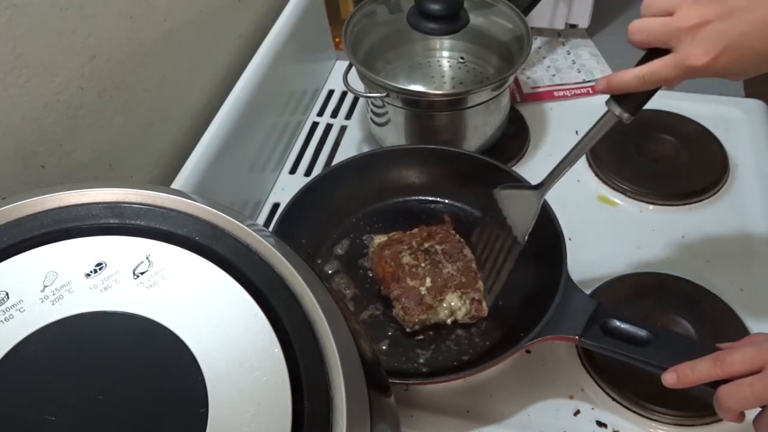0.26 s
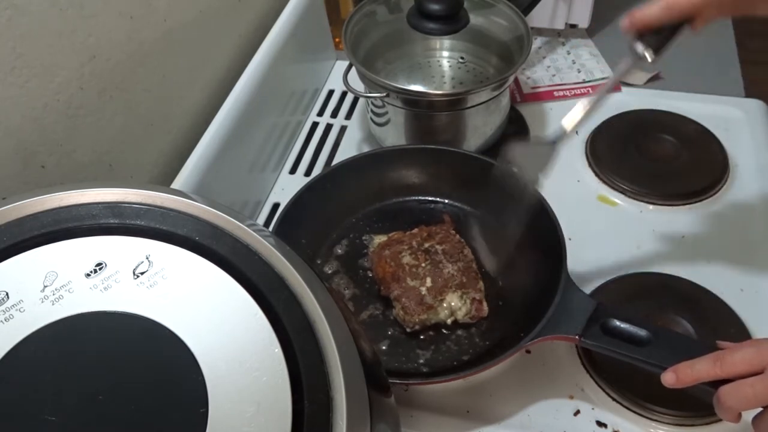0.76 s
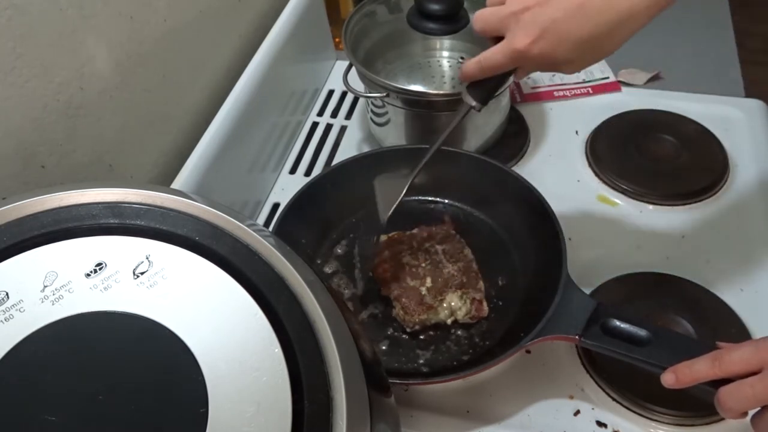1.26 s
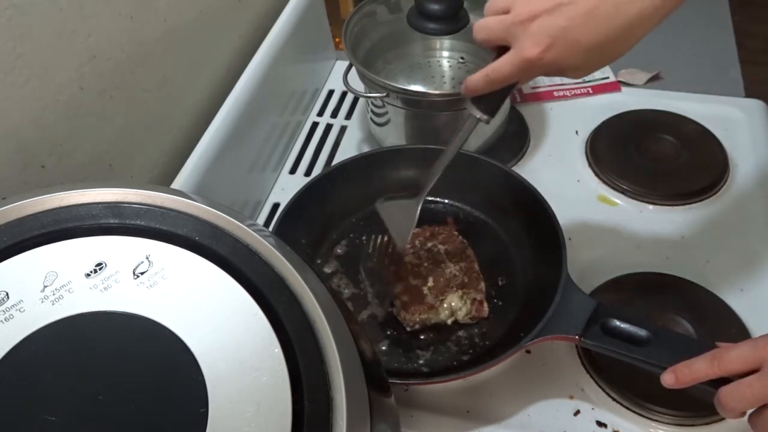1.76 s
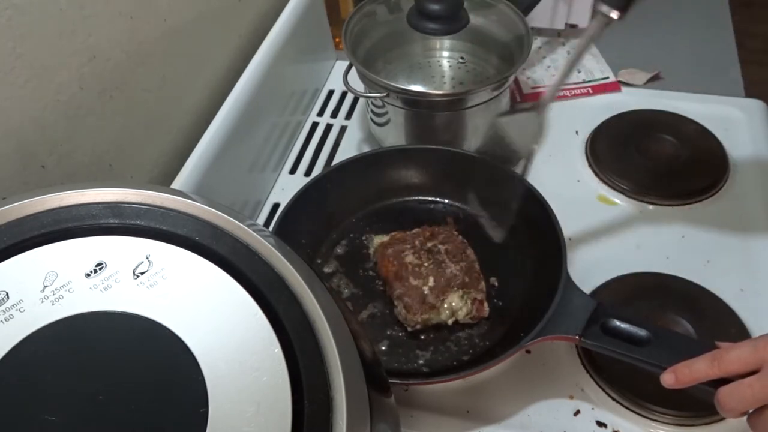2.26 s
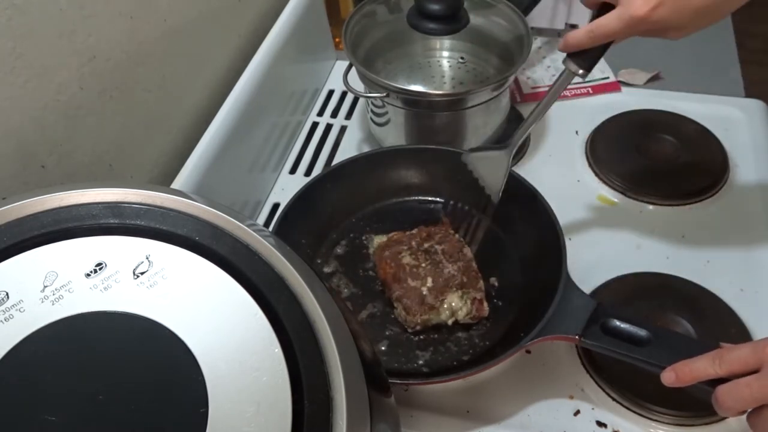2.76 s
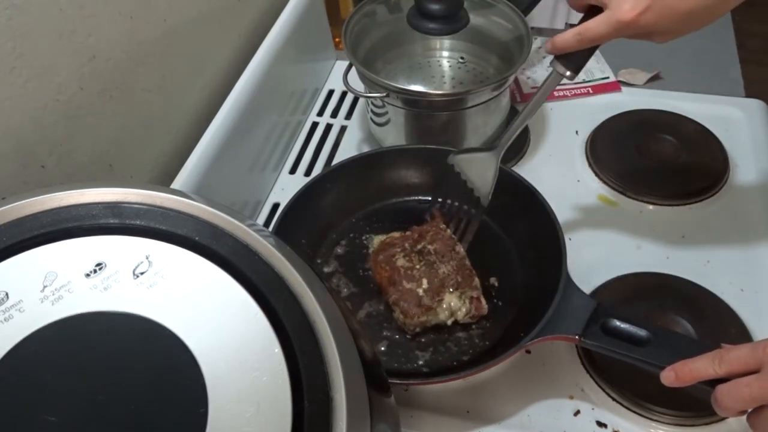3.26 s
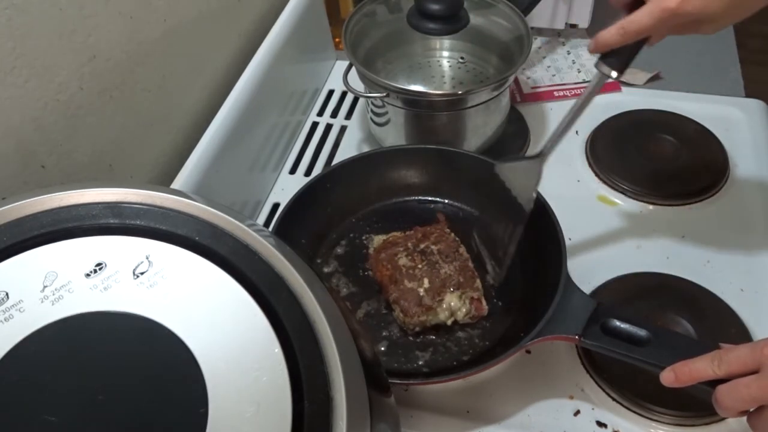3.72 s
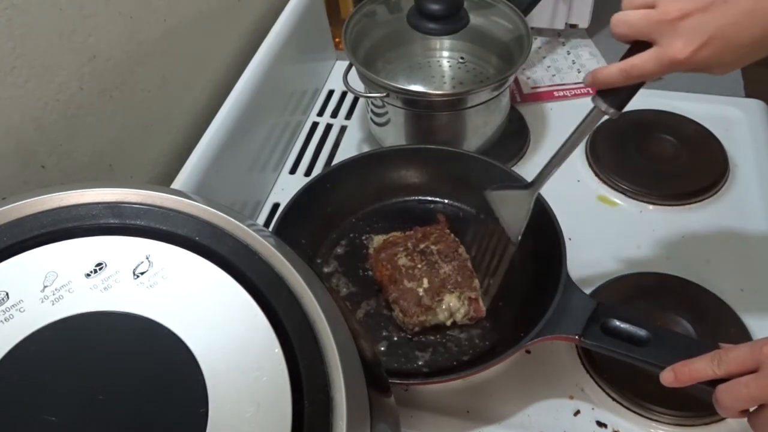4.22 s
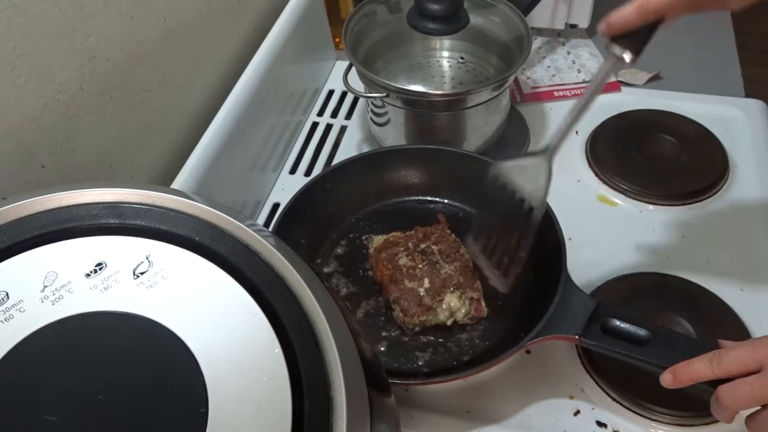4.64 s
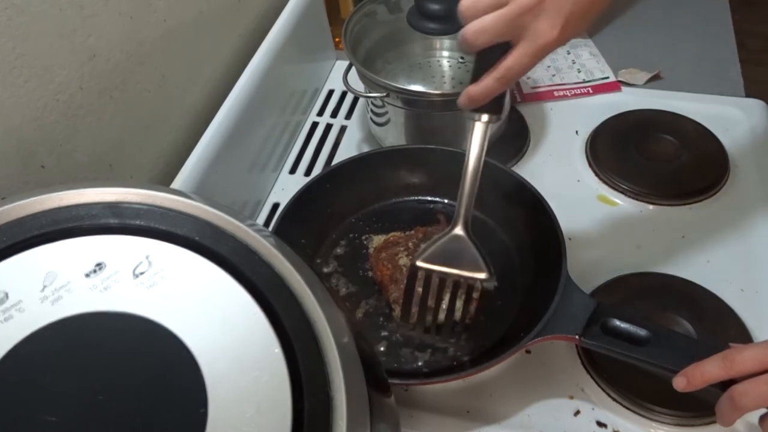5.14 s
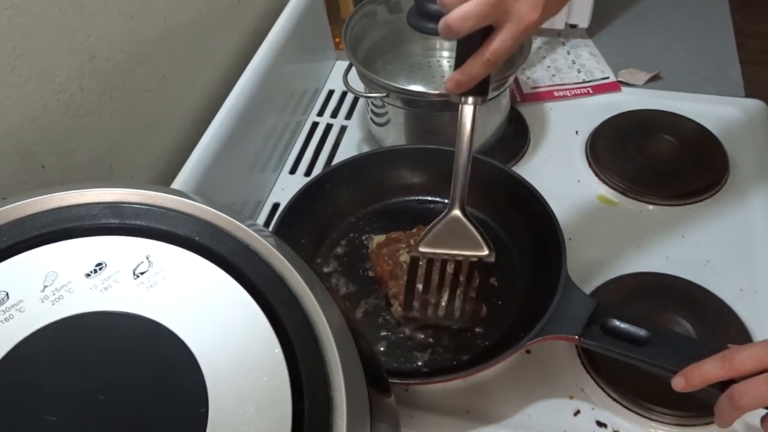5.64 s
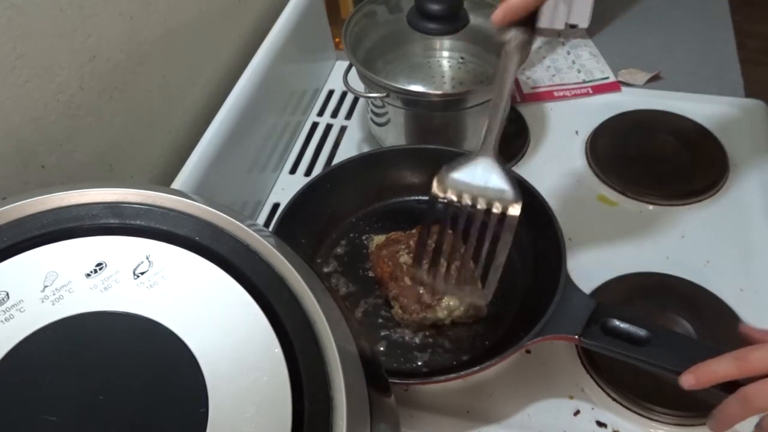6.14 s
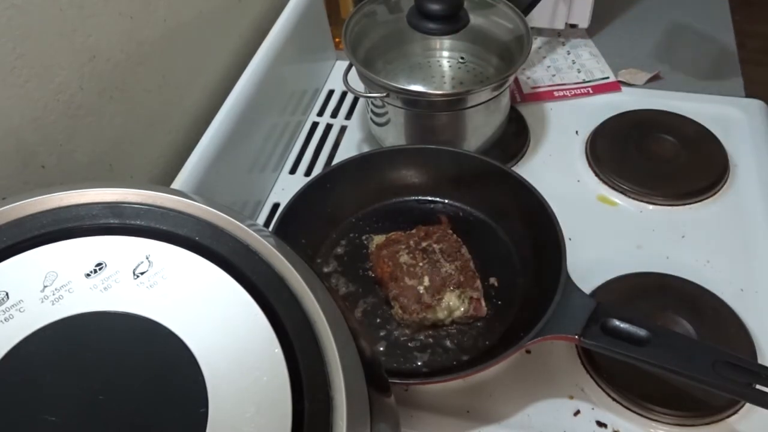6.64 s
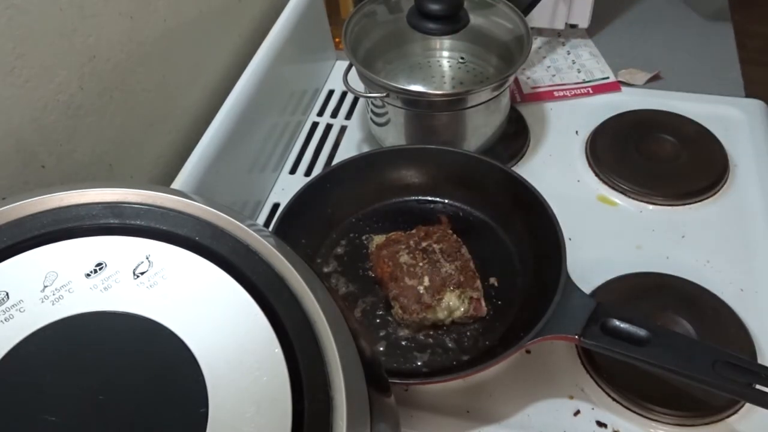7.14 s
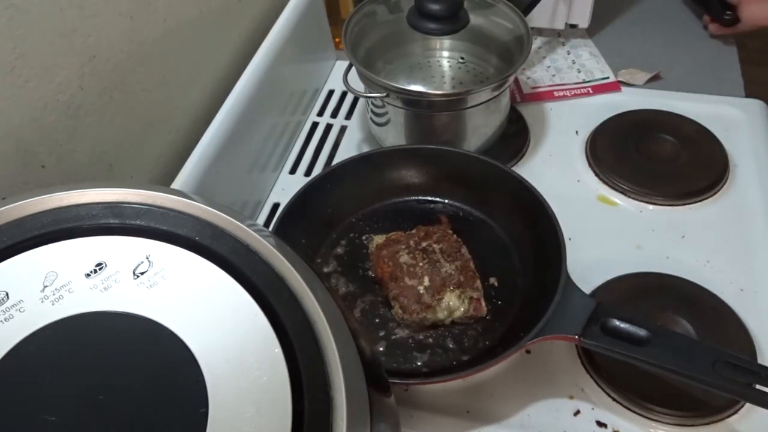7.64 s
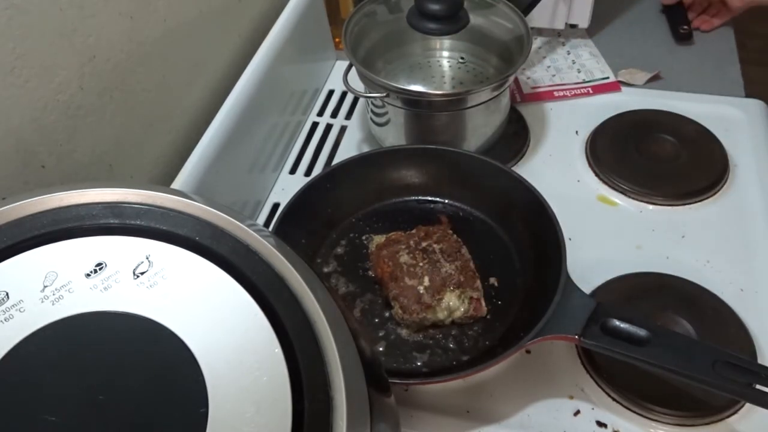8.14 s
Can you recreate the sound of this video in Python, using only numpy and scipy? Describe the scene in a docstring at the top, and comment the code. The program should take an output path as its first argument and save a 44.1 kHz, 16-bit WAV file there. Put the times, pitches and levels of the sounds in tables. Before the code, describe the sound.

Meat fries with dense hissing and crackling while a metal spatula taps and presses it; finally something hard rattles down beside the stove.

```python
"""Frying hiss and a short scrape come first, over a low mains hum: a meat patty in a pan on an electric stove.
Steam bubbles bursting in the fat are filtered noise (hiss), ringing clicks (fizz) and sharp snaps (spits).
A metal spatula scrapes, taps and pats: noise forces and slips ring modes of pan and blade; blows make the
sizzle flare. Steam vents are narrow noise bands. Near the end something clatters down beside the stove.
The kitchen adds dense reflections, and the recorder's gain ducks after loud sounds."""
import sys
import numpy as np
from scipy import signal
from scipy.fft import rfft, irfft, next_fast_len
from scipy.io import wavfile

SR = 44100
rng = np.random.default_rng(int(sys.argv[2]) if len(sys.argv) > 2 else 0)


def transcribe(signal):
    """Save signal, clipped to [-1, 1], as a 16-bit WAV file at the path in sys.argv[1]."""
    frames = np.atleast_2d(signal).T
    limited = np.clip(frames, -1, 1)
    pcm = np.round(limited * 32767).astype(np.int16)
    wavfile.write(sys.argv[1], SR, pcm)


N = 369333

# Spectrum of the sizzle common to both ears. Each row: frequency in Hz, relative density in dB per Hz.
SIZZLE_SPECTRUM = [(60, -18), (110, -27), (170, -17.5), (280, -19.5), (450, -15), (950, -11), (1300, -6),
                   (2000, -6.5), (3300, -3), (4900, -5), (6800, -1.5), (9500, -7), (12500, -7.5),
                   (16000, -14)]
# Modes of the pan on its hotplate. Each row: frequency in Hz, bandwidth in Hz, relative level in dB.
PAN_MODES = [(134, 34, -11), (211, 38, -3.5), (296, 42, 0), (408, 34, -2), (576, 65, 2.5), (647, 40, 5),
             (836, 14, -0.5), (985, 15, 3.5), (1270, 21, -16)]
# Modes of the spatula blade. Each row: frequency in Hz, bandwidth in Hz, relative level in dB.
BLADE_MODES = [(1222, 30, -2), (1504, 50, 7.5), (1660, 70, -2.5), (1627, 30, -3), (2000, 470, -21),
               (2750, 160, 3), (3510, 39, 3.5), (3990, 60, 5)]
# Modes of the worktop. Each row: frequency in Hz, bandwidth in Hz, relative level in dB.
WORKTOP_MODES = [(94, 21, -4), (200, 30, -11.5), (379, 70, 3), (429, 46, 6.5), (684, 37, 3), (778, 28, 4.5),
                 (934, 17, 7)]
# The spatula's edge taps the pan. Each row: start in seconds, force in dB, pan in dB, blade in dB.
EDGE_TAPS = [(1.323, -32, -38, -31.5), (1.853, -22, -39, -18.5), (1.913, -26.5, -47, -27),
             (1.944, -32, -50, -23.5), (2.512, -21, -24, -20), (4.072, -34.5, -41, -30.5),
             (4.120, -37, -44, -31), (4.645, -23, -54, -32), (4.664, -22.5, -42, -30)]
# The spatula's flat pats the meat. Each row: start in seconds, force in dB, contact cutoff in Hz,
# squelch in seconds.
FLAT_PATS = [(5.256, -18.5, 3830, 0.27), (5.643, -18, 1300, 0.16), (5.955, -20, 4360, 0.44)]
PAT_PAN_DB, PAT_BLADE_DB = -4.5, -11   # against the force: the pan booms, the meat mutes the blade


def from_db(db):
    """Amplitude ratio: 20 dB is a factor of ten."""
    return 10 ** (np.asarray(db) / 20)


def rms_one(x):
    """Normalization of the mean power to 1."""
    return x / np.sqrt(np.mean(x ** 2) + 1e-20)


def drift(rate):
    """Low-pass random process: chance that varies up to about the rate in Hz, with rms 1."""
    step = 40   # samples between computed points
    pole = np.exp(-2 * np.pi * rate * step / SR)
    noise = rng.standard_normal(N // step + 2002)
    slow = signal.lfilter([1], [1, -2 * pole, pole * pole], noise)[2000:]   # settled part
    return np.interp(np.arange(N) / step, np.arange(len(slow)), rms_one(slow))


def at_hz(points, hz):
    """Spectral envelope: gain read from a table, linear in dB over log frequency."""
    table = np.array(points)
    return from_db(np.interp(np.log(hz + 1), np.log(table[:, 0]), table[:, 1]))


def colour(x, points):
    """Linear filtering: the spectrum is multiplied by the envelope of a table."""
    size = next_fast_len(N)
    hz = np.arange(size // 2 + 1) * SR / size
    return irfft(rfft(x, size) * at_hz(points, hz), size)[..., :N]


def band(x, hz, kind="band", order=2):
    """Butterworth filtering: a maximally flat pass band."""
    sections = signal.butter(order, np.minimum(hz, .48 * SR), kind, fs=SR, output="sos")
    return signal.sosfilt(sections, x + 1e-18)


def resonance(x, hz, width):
    """Damped oscillator: one mode of unit peak gain, which dies faster the wider it is."""
    r = np.exp(-np.pi * width / SR)
    zeros = np.array([1, 0, -1]) * (1 - r * r) / 2
    poles = [1, -2 * r * np.cos(2 * np.pi * hz / SR), r * r]
    return signal.lfilter(zeros, poles, x + 1e-18)


def body(x, modes):
    """Modal superposition: an object's modes respond side by side, with alternating sign."""
    return sum((-1) ** k * from_db(db) * resonance(x, hz, width)
               for k, (hz, width, db) in enumerate(modes))


def bursts(per_s, spread_db, limit=3.76):
    """Poisson-like process: clicks at random moments, most of them small and a few large."""
    at = np.flatnonzero(rng.random(N) < per_s / SR)
    out = np.zeros(N)
    chance = rng.random((len(at), 2))
    size_db = spread_db * np.minimum(-np.log(chance[:, 0]), limit)
    out[at] = from_db(size_db) * np.sign(chance[:, 1] - .5)
    return out


def kitchen(x, wet_db, apart_hz=3600):
    """Diffuse reverberation: dense decaying reflections; mainly short waves differ between close microphones."""
    t60_s = 0.34   # decay by 60 dB
    t = np.arange(SR // 2) / SR
    mid, side = rng.standard_normal((2, len(t))) * from_db(-60 * t / t60_s) * (t > .002)
    side = band(side, apart_hz, "high", order=1)
    tail = (mid + side * [[1], [-1]]) / np.sqrt(np.sum(mid ** 2))
    return x + from_db(wet_db) * signal.fftconvolve(x[None], tail, axes=1)[:, :N]


def background():
    """Additive synthesis: wavering hum partials over coloured rumble and each microphone's faint noise."""
    # Each row: frequency in Hz, mean level in dB rms.
    hum_partials = [(49.2, -56.5), (98.2, -58.5), (129, -65.5)]
    # Low kitchen sound. Each row: frequency in Hz, relative density in dB per Hz.
    rumble_spectrum = [(20, -11), (50, 30), (100, -9), (160, -4), (280, 17), (500, -59), (1000, -36)]
    t, hum = np.arange(N) / SR, 0
    for hz, db in hum_partials:
        level = np.sqrt(2) * from_db(db + 0.24 * drift(1.5))
        hum = hum + level * np.sin(2 * np.pi * hz * t + .06 * drift(1.5))
    rumble = from_db(-75.0) * rms_one(colour(rng.standard_normal(N), rumble_spectrum))
    noise = rms_one(band(rng.standard_normal((2, N)), (45, 300), order=1))
    return hum + rumble + from_db(-76.5) * noise


def boil():
    """Heat and mass transfer: frying builds up, then sags as water boils off; pressed-out juice makes it flare."""
    sizzle_db, treble_db = -24.3, -22   # gains below and above 5 kHz, before swell and flares
    build_db, build_s = 3.5, 3.3
    sag_from_s, sag_db_per_s = 3.67, 0.38
    # the flare scale belongs to a press of firm_press_db in the pan
    flare_scale_db, firm_press_db, rise_s, fade_s = 1.1, -23, 0.092, 0.45
    treble_flare_share = 0.066
    t = np.arange(N) / SR
    build = -build_db * np.maximum(1 - t / build_s, 0) ** 2
    swell_db = build - sag_db_per_s * np.maximum(t - sag_from_s, 0)
    presses = [(s, pan_db) for s, _, pan_db, _ in EDGE_TAPS]
    presses += [(s, db + PAT_PAN_DB) for s, db, *_ in FLAT_PATS]
    flare_db = 0
    for s, press_db in presses:
        since = np.maximum(t - s, 0)
        shape = (1 - np.exp(-since / rise_s)) * np.exp(-since / fade_s)
        flare_db = flare_db + flare_scale_db * from_db(press_db - firm_press_db) * shape
    level = from_db(sizzle_db + swell_db + flare_db)
    treble = from_db(treble_db + swell_db + treble_flare_share * flare_db)
    return level, treble


def hiss(activity, flicker_db=1.0):
    """Central limit: countless tiny bursts merge into noise, and each range of sizes flickers by itself."""
    # Difference between the ears. Each row: frequency in Hz, relative density in dB per Hz.
    side_spectrum = [(110, -49), (400, -32.5), (900, -19.5), (2000, -21), (3300, -7.5), (4700, -2),
                     (8000, -2.5), (11000, -7), (16000, -12.5)]
    mid = colour(rng.standard_normal(N), SIZZLE_SPECTRUM)
    side = colour(rng.standard_normal(N), side_spectrum)
    rest = (mid + from_db(-0.5) * side * [[1], [-1]]) / np.std(mid)
    out = 0
    for edge_hz in (1890, 3520, 5460, 8000):
        low = signal.sosfiltfilt(signal.butter(2, edge_hz, fs=SR, output="sos"), rest)
        out = out + low * from_db(flicker_db * drift(32))
        rest = rest - low
    return (out + rest * from_db(flicker_db * drift(22))) * np.sqrt(activity)


def fizz(activity, per_s=40, cycles=11, spread_db=4.5):
    """Bubble resonance: larger bubbles ring briefly at a pitch set by size; small ones are most numerous."""
    out = 0
    for hz in np.geomspace(1800, 9000, num=20):
        rate = per_s * activity * (hz / 4000) ** 1.2   # per_s holds at 4 kHz
        rings = resonance(bursts(rate, spread_db), hz, hz / cycles)
        out = out + at_hz(SIZZLE_SPECTRUM, hz) * np.sqrt(hz) * rms_one(rings)
    return rms_one(out)


def snap(clicks, low_hz=2000, high_hz=7200):
    """Impulse radiation: a bursting film of fat gives one sharp swing of pressure, as high as the click."""
    impulse = np.eye(1, 256)[0]
    shape = band(band(impulse, low_hz, "high"), high_hz, "low", order=3)
    return np.convolve(clicks, shape / np.abs(shape).max())[:N]


def spurts(per_s=14, fade_s=0.015, spread_db=3.0):
    """Jet noise: steam escapes from under the meat in decaying puffs, through gaps of differing pitch."""
    out, keep = 0, np.exp(-1 / (fade_s * SR))
    for hz in np.geomspace(2400, 7600, num=10):
        puffs = np.abs(bursts(per_s, spread_db)) + 1e-18
        flow = signal.lfilter([1], [1, -keep], puffs)
        out = out + rms_one(resonance(flow * rng.standard_normal(N), hz, hz / 7))
    return rms_one(band(out, (1500, 9000)))


def frying():
    """Common modulation: hiss, fizz and crackle swell together as water meets hot fat, with a faint pan ring."""
    # Modes of the pan and its air. Each row: frequency in Hz, bandwidth in Hz, relative level in dB.
    ring_modes = [(288, 12.5, -1.5), (842, 11, -1), (1204, 16, 7), (1270, 16, -17), (1666, 35, -20.5),
                  (2410, 240, 0.5), (2580, 31, -10), (3180, 32, -18), (3676, 67, 6), (3880, 110, 3.5),
                  (4440, 65, -21), (5600, 30, -22), (6160, 73, 6.5), (5870, 57, -9), (7000, 40, -14.5),
                  (7370, 100, 4)]
    level, treble = boil()
    activity = from_db(.85 * drift(9) + .9 * drift(45))
    crackle = rms_one(snap(bursts(600 * activity, spread_db=5.5, limit=2.64)))
    grains = from_db(-5.0) * fizz(activity) + from_db(-6.5) * crackle + from_db(-9.5) * spurts()
    ring = rms_one(body(bursts(1500 * activity, spread_db=1), ring_modes))
    sizzle = from_db(-1) * hiss(activity) + kitchen(grains, wet_db=-6.5) + from_db(-11.0) * ring
    low = signal.sosfiltfilt(signal.butter(2, 5000, fs=SR, output="sos"), sizzle)
    return level * low + treble * (sizzle - low)


def scrapes():
    """Stick-slip friction: random slips make the pan rumble, the blade ring and the contact rasp."""
    # Each row: start in seconds, length in seconds, then relative levels in dB of pan, blade and rasp.
    slides = [(0.0, 0.048, -42, -34.5, -33.5), (0.65, 0.21, -53.5, -60, -59),
              (1.423, 0.12, -50, -36, -26.5), (1.746, 0.068, -57, -46, -31), (2.585, 0.14, -41, -61, -58),
              (3.846, 0.23, -43.5, -37, -48), (4.14, 0.18, -46.5, -38, -43), (4.4, 0.19, -49, -57, -55)]
    t, slips, out = np.arange(N) / SR, bursts(900, spread_db=3.0), 0
    rumble = band(body(slips, PAN_MODES), 310, "low", order=1)
    ring = body(slips, BLADE_MODES[:4])
    rasp = band(slips, (900, 2600), order=3)
    parts = np.array([rms_one(rumble), rms_one(ring), rms_one(rasp)]) * from_db(2.9 * drift(43))
    for s, length, *levels_db in slides:
        stroke = np.sin(np.pi * np.clip((t - s) / length, 0, 1))
        out = out + stroke * (from_db(levels_db) @ parts)
    return out


def spits(spit_db=1.0, small_per_s=12, small_db=-16.0):
    """Explosive boiling: single drops of water burst with a thin, bright tick; smaller ones come at random."""
    # Loudest spits. Each row: start in seconds, relative peak in dB.
    loud_spits = [(0.7701, -9), (1.103, -9), (1.3494, -4), (1.758, -0.5), (2.0855, 1.5), (3.5987, -5),
                  (4.03, -10), (5.1701, 0.5), (5.4993, 0)]
    clicks = from_db(small_db) * bursts(small_per_s, spread_db=6.0, limit=2.2)
    for s, db in loud_spits:
        clicks[int(s * SR)] = from_db(db + spit_db) * rng.choice([-1, 1])
    return kitchen(snap(clicks, low_hz=2630, high_hz=6660), wet_db=-1.5)


def knocks(rows, low_modes, high_modes, impact_db, crack_hz, impact_s=0.03):
    """Impact excitation: a blow and its dying chatter ring both bodies; a soft contact passes less treble."""
    out, t = np.zeros(N + SR), np.arange(SR // 2) / SR
    for s, low_db, high_db, crack_db, contact_hz, chatter_s in rows:
        dying = from_db(-60 * t / max(chatter_s, .01)) + from_db(impact_db - 60 * t / impact_s)
        force = rng.standard_normal(len(t)) * dying
        force[0] = 7 * dying[0]   # first touch
        force = band(force, contact_hz, "low", order=5)
        parts = body(force, low_modes), body(force, high_modes), band(force, crack_hz, "high")
        start = int(s * SR)
        for part, db in zip(parts, (low_db, high_db, crack_db)):
            early = np.std(part[:SR // 32])   # levels refer to the first 1/32 s
            out[start:start + len(t)] += from_db(db) * part / early
    return out[:N]


def spatula():
    """Nonlinear contact: a harder tap is brighter and chatters longer; pats with the flat and scrapes join in."""
    firm_db = -17.5   # force at which a tap has the cutoff and chatter below
    firm_hz, hz_power = 4230, 0.42
    firm_chatter_s, chatter_power = 0.19, 0.5
    taps = []
    for s, db, pan_db, blade_db in EDGE_TAPS:
        force = from_db(db - firm_db)
        contact_hz, chatter_s = firm_hz * force ** hz_power, firm_chatter_s * force ** chatter_power
        taps.append((s, pan_db, blade_db, db, contact_hz, chatter_s))
    pats = [(s, db + PAT_PAN_DB, db + PAT_BLADE_DB, db, hz, squelch_s)
            for s, db, hz, squelch_s in FLAT_PATS]
    edge = knocks(taps, PAN_MODES, BLADE_MODES, impact_db=0.0, crack_hz=750)
    flat = knocks(pats, PAN_MODES, BLADE_MODES, impact_db=3.0, crack_hz=550)
    return edge + flat + scrapes()


def vents():
    """Jet noise: steam from under the meat swells and fades through a narrow gap, sputtering as it goes."""
    # Each row: start in seconds, length in seconds, centre frequency in Hz, relative level in dB.
    jets = [(1.50, 0.15, 10500, -31), (2.65, 1.3, 3510, -31), (4.33, 0.12, 6760, -26),
            (5.03, 0.19, 6500, -26.5), (5.42, 0.095, 6700, -27), (6.308, 0.15, 6700, -28),
            (7.345, 0.1, 10430, -31)]
    width, grains_per_s = .2, 2800   # width as a share of the centre frequency
    t, out = np.arange(N) / SR, 0
    flow = bursts(grains_per_s, spread_db=3.0) * from_db(2.1 * drift(50))
    for s, length, hz, db in jets:
        jet = rms_one(band(flow, (hz * (1 - width / 2), hz * (1 + width / 2))))
        swell = np.sin(np.pi * np.clip((t - s) / length, 0, 1))
        out = out + from_db(db) * swell * jet
    return from_db(-3.0) * kitchen(out, wet_db=1.5)


def sliding(start_s=8.09, length_s=0.26, level_db=-43):
    """Friction excitation: the thing just put down shifts a little, and its slips ring the worktop."""
    push = np.sin(np.pi * np.clip((np.arange(N) / SR - start_s) / length_s, 0, 1))
    return from_db(level_db) * push * rms_one(body(bursts(600, spread_db=5), WORKTOP_MODES))


def clatter():
    """Repeated impact: a hard object touches the worktop, rattles to rest and slides; both bodies ring."""
    # Each row: start in seconds, force in dB, thud of the worktop in dB.
    touches = [(7.344, -35, -48), (7.647, -31.5, -39.5), (7.892, -25, -34), (7.915, -28, -35),
               (7.951, -22.5, -24.5), (7.984, -24.5, -35), (8.010, -23, -26)]
    # The object's own ring. Each row: frequency in Hz, bandwidth in Hz, relative level in dB.
    object_modes = [(1254, 58, -5), (1400, 38, -11), (1580, 53, -2), (1860, 76, 4), (2230, 76, 4.5),
                    (2610, 160, 8), (3080, 100, -11)]
    contact_hz, chatter_s, ring_db = 3070, .11, 1.5   # ring against the force
    rows = [(s, thud_db, db + ring_db, db, contact_hz, chatter_s) for s, db, thud_db in touches]
    return knocks(rows, WORKTOP_MODES, object_modes, impact_db=-11.0, crack_hz=450) + sliding()


def scene():
    """Linear superposition: all sources around the stove add; the frying lies a shade to the left."""
    fat = (frying() + vents() + spits()) * from_db(np.array([[.2], [-.2]]))
    return fat + kitchen(spatula(), wet_db=-1.5) + kitchen(clatter(), wet_db=0.5) + background()


def record(dry, threshold_db=-15.5, release_db_per_s=70, share=0.56, attack_s=0.0015):
    """Compression: gain ducks a moment after a loud sound and recovers; peaks are rounded, the top is cut."""
    cutoff_hz = 15900
    keep = np.exp(-1 / (attack_s * SR))
    power = signal.lfilter([1 - keep], [1, -keep], np.mean(dry ** 2, axis=0))
    level_db = 10 * np.log10(power + 1e-12)
    # the excess jumps up with the level and falls at a steady rate
    fall = release_db_per_s * np.arange(N) / SR
    over_db = np.maximum.accumulate(np.maximum(level_db - threshold_db, 0) + fall) - fall
    ducked = dry * from_db(-share * signal.lfilter([1 - keep], [1, -keep], over_db))
    rounded = .75 * np.tanh(ducked / .75)
    return signal.sosfilt(signal.ellip(12, .1, 90, cutoff_hz, fs=SR, output="sos"), rounded)


dry = scene()
out = record(dry)
transcribe(out)
```